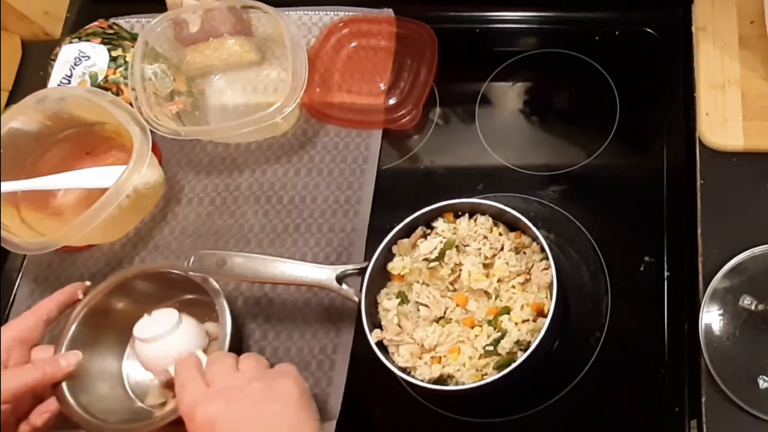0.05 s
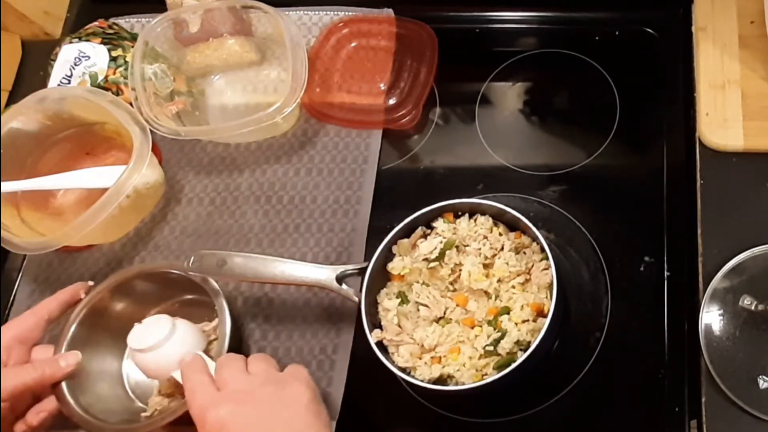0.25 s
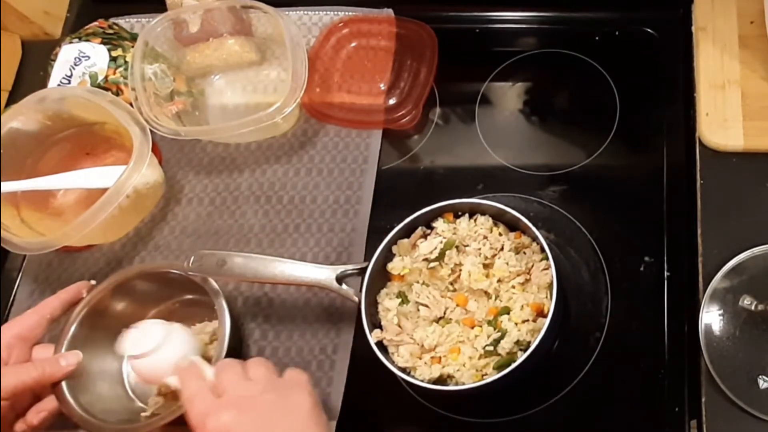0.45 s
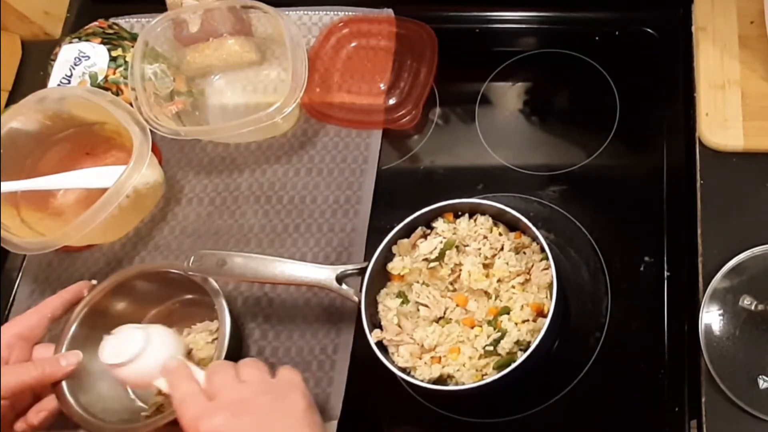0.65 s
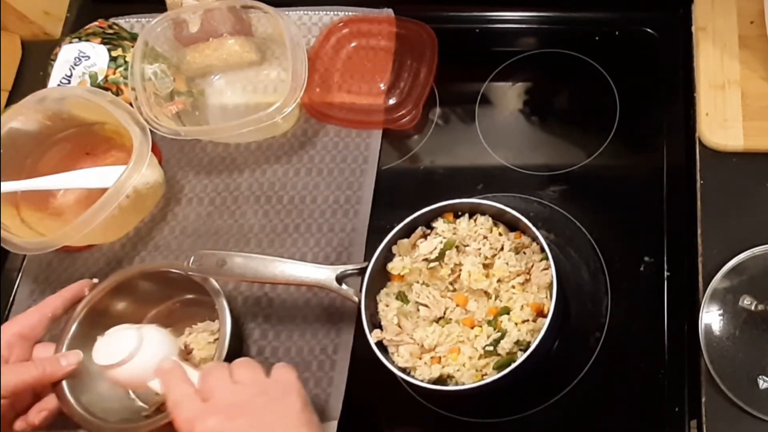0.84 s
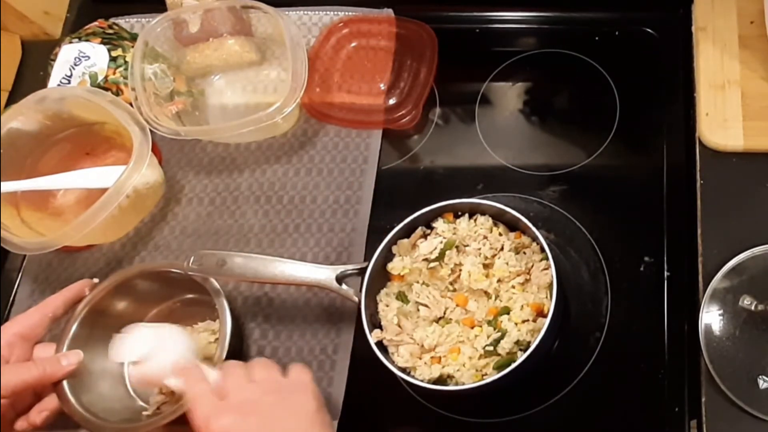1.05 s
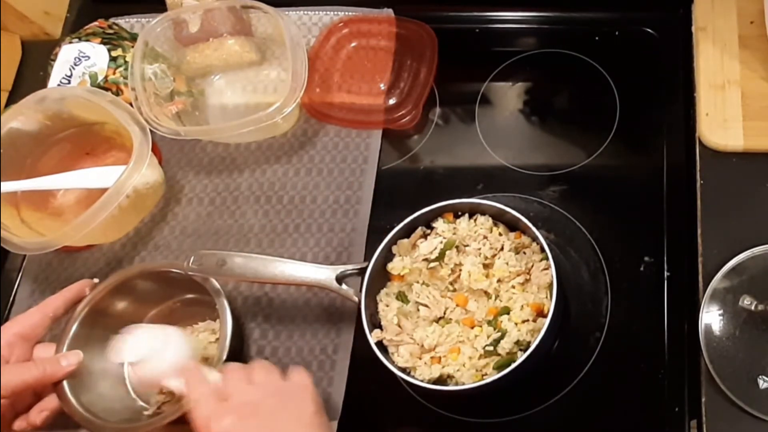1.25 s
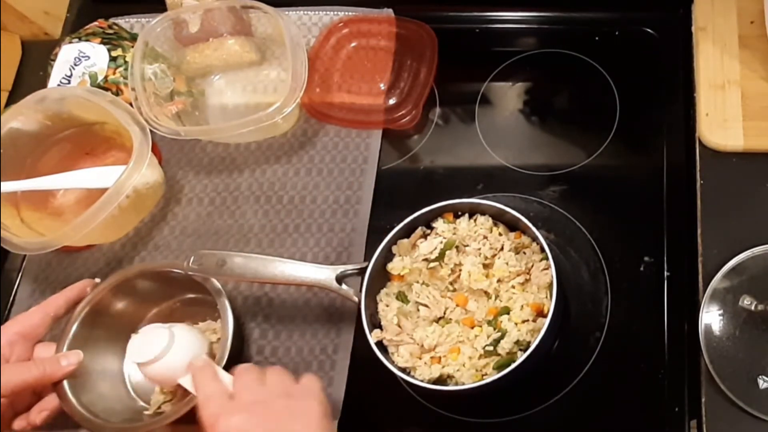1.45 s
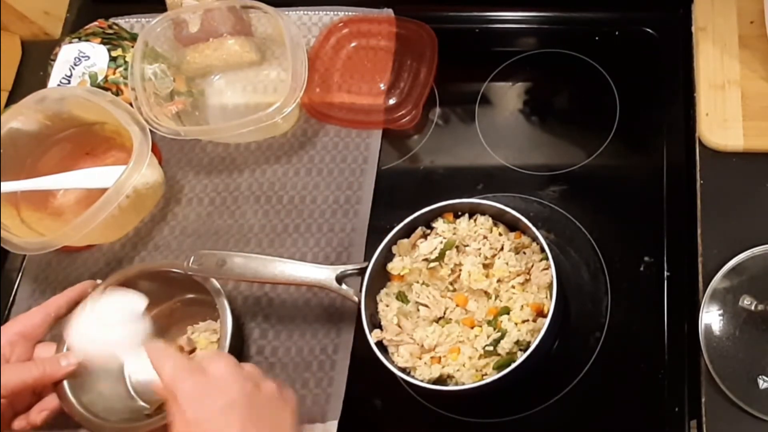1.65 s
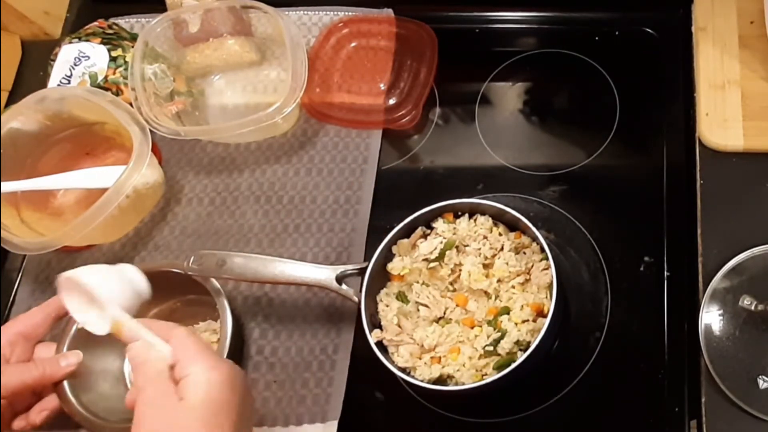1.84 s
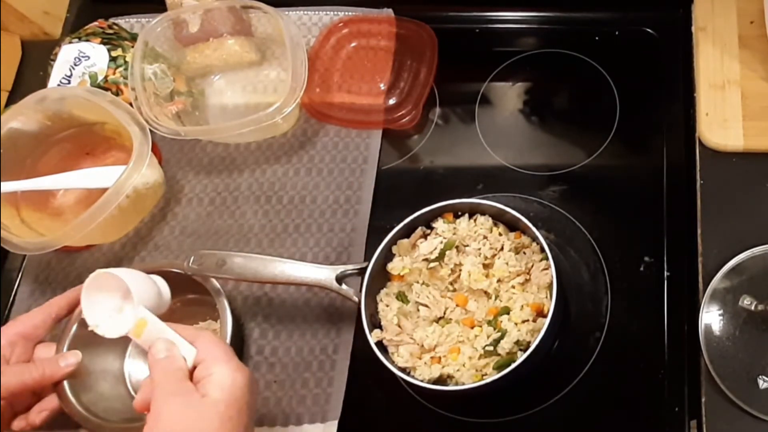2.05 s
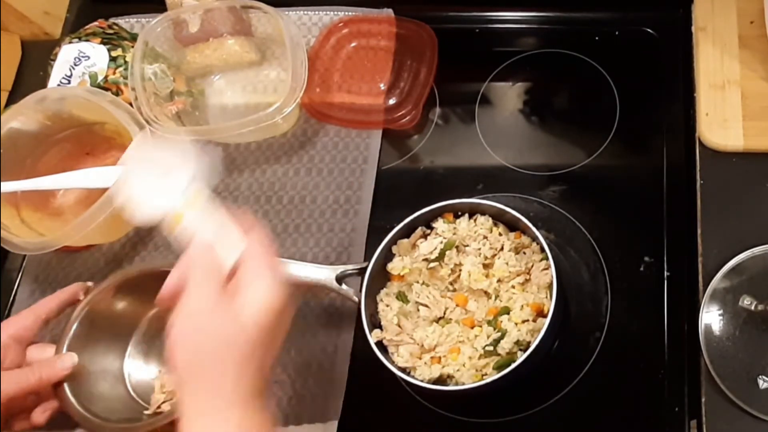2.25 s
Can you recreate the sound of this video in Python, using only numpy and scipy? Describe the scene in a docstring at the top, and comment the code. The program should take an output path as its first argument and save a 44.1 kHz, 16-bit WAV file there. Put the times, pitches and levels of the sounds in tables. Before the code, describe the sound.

A plastic scoop taps rapidly on a steel pan rim, then a soft brushing follows.

```python
"""A plastic scoop knocks rapidly on the rim of a steel saucepan that a hand holds and damps.
Each impact excites damped modes and a noise transient: a hollow knock, a bright click, a short ring
and a low thud, with the reverberation of a small kitchen. The stove top booms faintly below.
Soft swishes lie between the taps; the scoop rubs off the rim, and a soft brushing rises as it lifts."""
import sys
import numpy as np
from scipy import signal
from scipy.fft import rfft, irfft, next_fast_len
from scipy.io import wavfile
from scipy.ndimage import map_coordinates

SR = 44100
rng = np.random.default_rng(int(sys.argv[2]) if len(sys.argv) > 2 else 0)


def generate_wav(signal):
    """Clip the signal to [-1, 1] and save it as 16-bit WAV at the path in sys.argv[1]."""
    frames = np.transpose(np.atleast_2d(signal))
    scaled = np.clip(frames, -1, 1) * 32767
    pcm = np.round(scaled).astype(np.int16)
    wavfile.write(sys.argv[1], SR, pcm)


N = 101429

# Blows on the rim: start_s, strength_db, favoured_hz, upper_modes_db, click_db
RIM_TAPS = [(-.11, -7, 834, 3.5, 5), (0.0575, -14, 750, 1, 3.5), (0.2189, -2.5, 770, 0, 1),
            (.3885, -2, 895, 2, -0.5), (0.5543, 0.5, 812, -0.5, -0.5), (0.729, 0, 836, -1.5, 2.5),
            (0.9123, 0.5, 901, 0.5, 2), (1.0854, 1, 959, 4, -1.5), (1.2770, 0.5, 892, -1, 0.5),
            (1.4516, 2.5, 912, 3.5, -3)]
def scoop_taps():
    """Superposition: each impact is heard directly, as an inverted reflection and as reverberation."""
    out, t = np.zeros(N), np.arange(SR // 2) / SR
    walls = rng.standard_normal(len(t))
    reflection_s, reflection_db, room_delay_s = 0.00467, -4, 0.0055
    for start_s, strength_db, favoured_hz, upper_db, click_db in RIM_TAPS:
        knock = contact_knock(t, favoured_hz, upper_db)
        ring = pan_ring(t, favoured_hz, upper_db)
        thud = pan_thud(t, strength_db)
        click = contact_click(t, strength_db, click_db)
        reflection = -filtered(knock, lambda hz: high_pass(hz, 1470))
        add(out, start_s, amp(strength_db) * (knock + click + ring + thud))
        add(out, start_s + reflection_s, amp(strength_db + reflection_db) * reflection)
        add(out, start_s + room_delay_s, amp(strength_db) * kitchen(knock + click + thud, walls))
    return out


# Modes of scoop and pan in contact: pitch_hz, level_db, t60_s
CONTACT_MODES = [(549.1, -30, 0.058), (587, -16.5, 0.045), (816.5, -21.5, 0.057), (868.8, -16, 0.05),
                 (932.4, -14.5, 0.038), (997, -30.5, 0.043), (1377, -10, 0.021), (1592, -12, 0.036),
                 (1776.4, -14.5, 0.039), (1999, -16.5, 0.023), (2543, -25, 0.029), (2586, -19.5, 0.014),
                 (2663, -40.5, 0.02)]
def contact_knock(t, favoured_hz, upper_db):
    """Impulse response: heavily damped modes start in phase and make a hollow knock."""
    return sum(mode(t, hz, db + coupling_db(hz, favoured_hz, upper_db), t60_s)
               for hz, db, t60_s in CONTACT_MODES)


# Free modes of the pan: pitch_hz, level_db, t60_s
PAN_MODES = [(517, -26, 0.11), (808, -42, 0.5), (815, -28.5, 0.18), (837, -48, 0.315), (953, -42.5, 0.38),
             (983, -31, .27), (1070, -46.5, .28), (1476, -29, 0.17), (1731, -39, 0.4), (1680, -36.5, 0.27),
             (4370, -47, .25), (5900, -53.5, .25), (7400, -50.5, .27), (9570, -52, .2),
             (10350, -61.5, 0.53)]
def pan_ring(t, favoured_hz, upper_db):
    """Free vibration: the pan's less damped modes outlast the knock."""
    return sum(mode(t, hz, db + coupling_db(hz, favoured_hz, upper_db, share=0.55), t60_s,
                    phase=rng.uniform(0, 2 * np.pi))
               for hz, db, t60_s in PAN_MODES)


def coupling_db(hz, favoured_hz, upper_db, share=1):
    """Modal coupling: the place struck favours certain modes; the lowest answer alike anywhere."""
    octaves_off = np.log2(hz / favoured_hz)
    favour_db = 10.5 * np.exp(-(octaves_off / 0.091) ** 2) * (hz > 700)
    return share * favour_db + upper_db * np.interp(hz, [1050, 1400], [0, 1])


# Spectrum of the click: frequency_hz, density_db
CLICK_SPECTRUM = [(400, -6), (1200, -18), (2100, -2), (2700, 3), (3200, -22), (4100, -14.5), (4600, -2.5),
                  (5700, -2), (6800, -9), (8200, 1.5), (9100, -6), (10050, 0.5), (10700, -15.5),
                  (12300, -19), (15500, -29)]
def contact_click(t, strength_db, click_db):
    """Broadband transient: a brief contact gives a noise burst, brighter for harder blows."""
    burst = amp(click_db - 16) * struck(t, rise_s=0.00043, t60_s=0.049) * noise(CLICK_SPECTRUM, len(t))
    return filtered(burst, lambda hz: amp(0.72 * strength_db * (0.5 + high_pass(hz, 7800))))


# Low modes of the pan on its mat: pitch_hz, level_db, t60_s
MAT_MODES = [(135, -37.5, 0.13), (172.5, -30.5, 0.11), (204.5, -41.5, 0.27), (235.3, -52.5, 0.32),
             (262, -35.5, 0.21), (387.7, -50, .12)]
def pan_thud(t, strength_db):
    """Nonlinear response: low modes of alternating sign grow faster than the strength of the blow."""
    modes = sum(mode(t, hz, db, t60_s, rise_s=0.0024, phase=k * np.pi)
                for k, (hz, db, t60_s) in enumerate(MAT_MODES))
    return amp(0.83 * strength_db) * modes


# Decay of the room: frequency_hz, t60_s
KITCHEN_DECAY = [(150, 0.94), (400, 0.2), (1000, 0.39), (1700, 0.3), (2600, 0.35), (3600, 0.49),
                 (5000, 0.34), (8000, 0.3), (14000, 0.21)]
# Colour of the reverberation: frequency_hz, gain_db
KITCHEN_GAIN = [(150, -12.5), (500, -5), (1000, -10), (2000, -8), (2700, -13), (3500, -5), (4200, -10),
                (5000, -8), (9000, -12), (14000, -9)]
def kitchen(tap, walls):
    """Reverberation: convolution with a diffuse tail in which each frequency decays at its own rate."""
    # the same room tail for every tap, mixed with fresh noise so each rings slightly differently
    echoes = walls + 0.9 * rng.standard_normal(len(walls))
    hz, t, bands = signal.stft(echoes, SR, nperseg=256)
    decay = struck(t, rise_s=0.0054, t60_s=along(KITCHEN_DECAY, hz)[:, None])
    tail = signal.istft(bands * decay, SR, nperseg=256)[1]
    tail = filtered(tail / np.linalg.norm(tail), lambda f: amp(along(KITCHEN_GAIN, f)))
    return signal.fftconvolve(tap, tail)


# High resonances of the rubbed rim: frequency_hz, density_db
RIM_SPECTRUM = [(1500, -11.5), (3400, -9), (5600, -11.5), (6050, -1.5), (6400, -13.5), (6900, -0.5),
                (7500, -30), (9200, -29), (9500, 0.5), (9900, -13), (12000, -15), (14000, -33)]
def slide_off():
    """Friction excitation: the rim sings faintly as the scoop slides off it."""
    out, t = np.zeros(N), np.arange(N) / SR
    rub = amp(-54) * struck(t, rise_s=0.03, t60_s=0.52) * noise(RIM_SPECTRUM, N)
    add(out, start_s=1.657, sound=rub)
    return out


# Soft swishes: crest_s, width_s, level_db
SWISH_SWELLS = [(0.054, 0.037, -47.5), (0.165, 0.022, -46.5), (0.281, 0.048, -42.5), (0.458, 0.075, -44),
                (0.632, 0.045, -46.5), (0.815, 0.04, -47.5), (1.007, 0.043, -49.5), (2.201, 0.04, -67)]
# Spectrum of a swish: frequency_hz, density_db
SWISH_SPECTRUM = [(300, -1), (1000, -8.5), (1800, -0.5), (2600, -2.5), (3500, -2), (4500, 0), (7000, -8.5),
                  (10500, -17), (13000, -28.5), (16000, -34.5)]
def swishes():
    """Amplitude modulation: noise swells softly, and fast random changes of level make it gritty."""
    envelope = sum(amp(db) * swell(crest_s, width_s) for crest_s, width_s, db in SWISH_SWELLS)
    grit = unit(amp(4.5 * wobble(rate_hz=20) + 0.89 * wobble(rate_hz=2100)))
    return envelope * grit * noise(SWISH_SPECTRUM, N)


# Spectrum of the brushing: frequency_hz, density_db
BRUSH_SPECTRUM = [(180, -41.5), (300, -14), (403, -16.5), (884, -2), (1420, -22.5), (2600, -13.5),
                  (2870, -20), (3550, -12), (5800, -13.5), (7060, -4.5), (7920, -15), (10500, -22),
                  (15000, -52)]
def brushing(onset_s=2.272, rise_s=0.011):
    """Friction noise: a soft brushing rises in one smooth step as the scoop is lifted away."""
    t = np.arange(N) / SR
    step = (1 + np.tanh((t - onset_s) / (2 * rise_s))) / 2
    return amp(-41.5) * step * noise(BRUSH_SPECTRUM, N)


def stove_top(lag_s=0.087, scoop_off_s=1.81):
    """Structure-borne sound: the surface under the pan booms and wavers, swelling after each tap."""
    swells = sum(amp(-41.5 + 0.63 * strength_db) * swell(start_s + lag_s, width_s=0.045)
                 for start_s, strength_db, *_ in RIM_TAPS)
    sustain = amp(-52) * np.clip((scoop_off_s - np.arange(N) / SR) / 0.041, 0, 1)
    pitch_hz = 65.1 + 8.1 * wobble(rate_hz=11)
    flutter = amp(2.5 * wobble(rate_hz=26))
    boom = unit(flutter * np.sin(2 * np.pi * np.cumsum(pitch_hz) / SR))
    return np.hypot(swells, sustain) * boom


# Spectrum of the quiet kitchen: frequency_hz, density_db
BACKGROUND_SPECTRUM = [(15, -70.5), (25, -23.5), (70, -2), (114, -15), (161, -6), (335, -11), (416, -17.5),
                       (463, -12), (962, -22.5), (1740, -28.5), (1890, -35), (7710, -36.5), (16000, -49.5)]
def background():
    """Stationary noise: a faint, steady rumble with a trace of hiss."""
    return amp(-56) * noise(BACKGROUND_SPECTRUM, N)


def mode(t, hz, level_db, t60_s, rise_s=0.0018, phase=0):
    """Damped harmonic oscillator, its level scattered a little from blow to blow."""
    gain = amp(level_db + 1.2 * rng.standard_normal())
    return gain * struck(t, rise_s, t60_s) * np.cos(2 * np.pi * hz * t + phase)


def struck(t, rise_s, t60_s):
    """Quick rise and exponential decay."""
    return (1 - np.exp(-t / rise_s)) * amp(-60 * t / t60_s)


def swell(crest_s, width_s):
    """Gaussian envelope with standard deviation width_s."""
    return np.exp(-((np.arange(N) / SR - crest_s) / width_s) ** 2 / 2)


def wobble(rate_hz):
    """Spline through rate_hz random knots a second."""
    return map_coordinates(rng.standard_normal(N // 100), [np.arange(N) * rate_hz / SR], mode="wrap")


def noise(spectrum, size):
    """Coloured noise of rms 1."""
    return unit(filtered(rng.standard_normal(size), lambda hz: amp(along(spectrum, hz))))


def filtered(x, response):
    """Linear filter: the spectrum of x times a frequency response."""
    size = next_fast_len(len(x) + 8192)
    return irfft(rfft(x, size) * response(np.fft.rfftfreq(size, 1 / SR)), size)[:len(x)]


def high_pass(hz, corner_hz):
    """Gain rising steeply from 0 to 1 around the corner."""
    return 1 - 1 / (1 + (hz / corner_hz) ** 10)


def along(points, hz):
    """Interpolation on a logarithmic frequency axis."""
    knots_hz, values = np.transpose(points)
    return np.interp(np.log(hz + 1), np.log(knots_hz + 1), values)


def amp(db):
    """Decibels to gain."""
    return 10 ** (np.asarray(db) / 20)


def unit(x):
    """Scale to rms 1."""
    return x / np.sqrt(np.mean(x ** 2) + 1e-20)


def add(track, start_s, sound):
    """Mix a sound into the track from start_s, which may be negative."""
    start = round(start_s * SR)
    sound = sound[max(-start, 0):]
    part = track[max(start, 0):][:len(sound)]
    part += sound[:len(part)]


def scene():
    """Superposition: all sources add in one channel."""
    return (scoop_taps() + slide_off() + swishes() + brushing() + stove_top() + background())[None]


def record(dry):
    """Hard clipping at full scale, then an ideal low-pass filter."""
    clipped = np.clip(dry[0], -1, 1)
    return filtered(clipped, lambda hz: hz < 15800)[None]


dry = scene()
out = record(dry)
generate_wav(out)
```